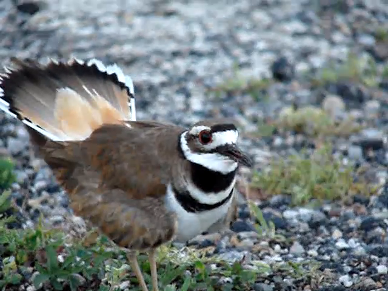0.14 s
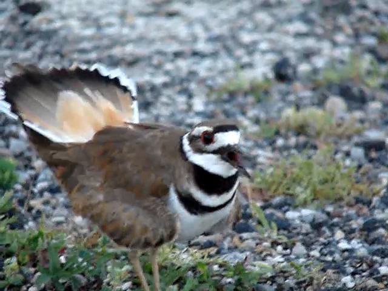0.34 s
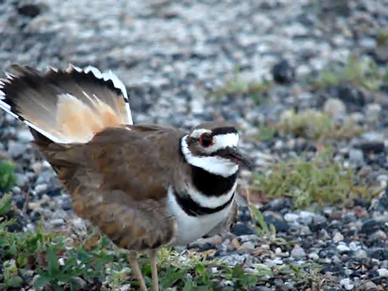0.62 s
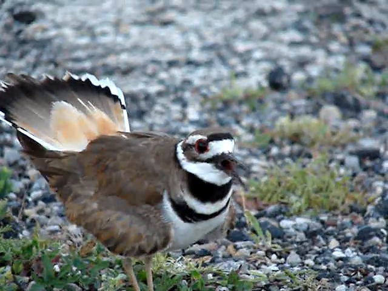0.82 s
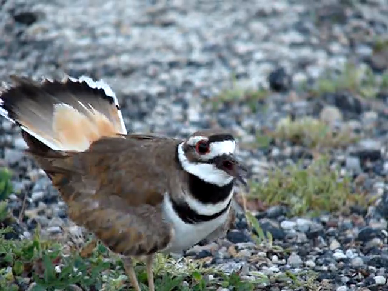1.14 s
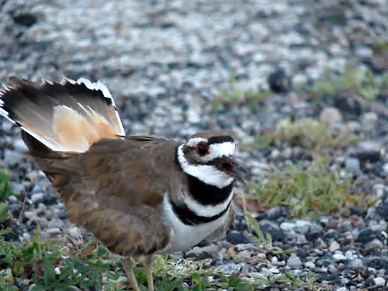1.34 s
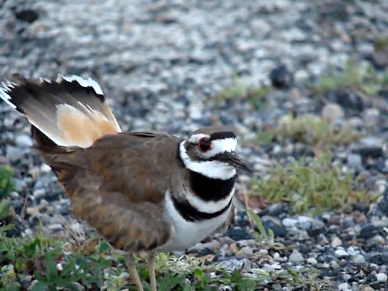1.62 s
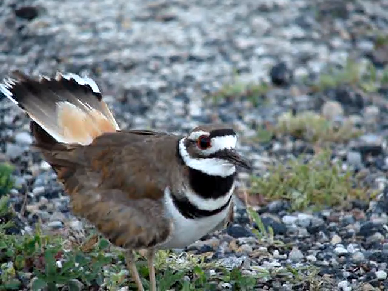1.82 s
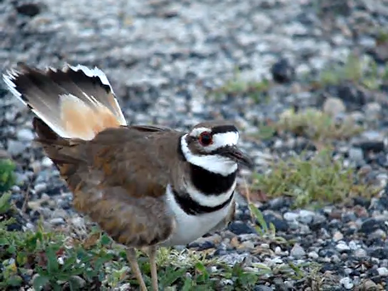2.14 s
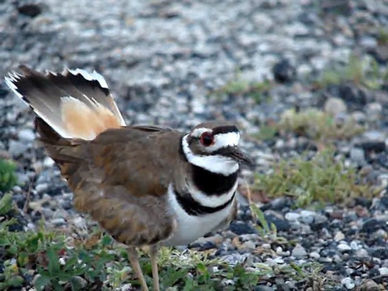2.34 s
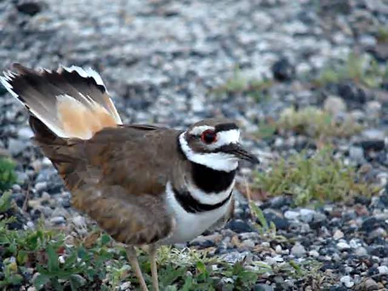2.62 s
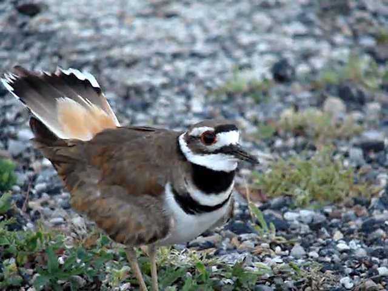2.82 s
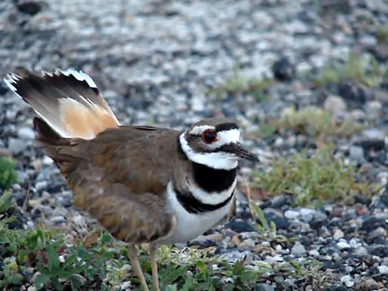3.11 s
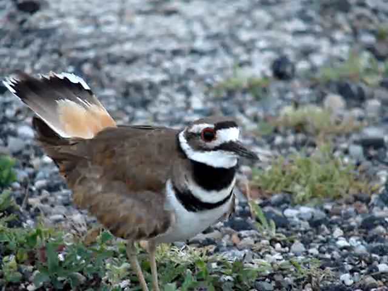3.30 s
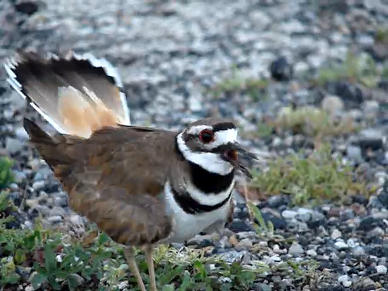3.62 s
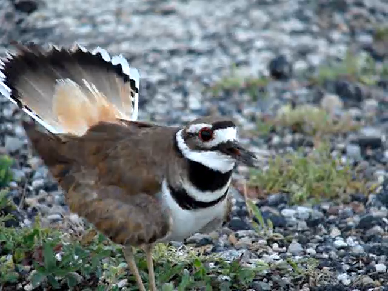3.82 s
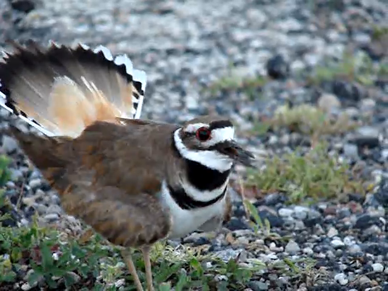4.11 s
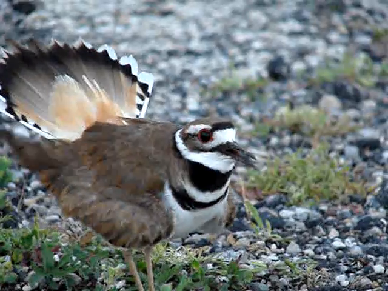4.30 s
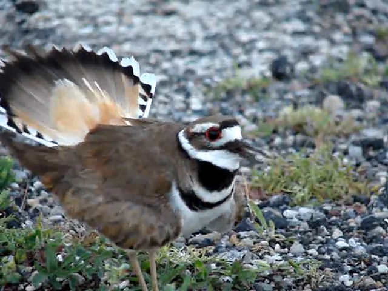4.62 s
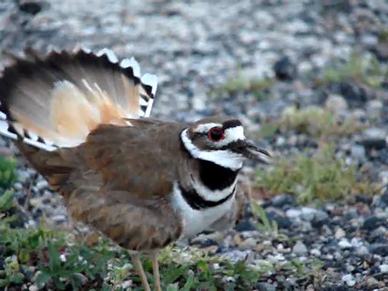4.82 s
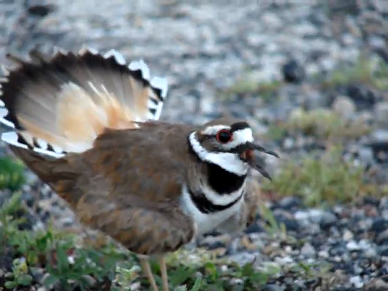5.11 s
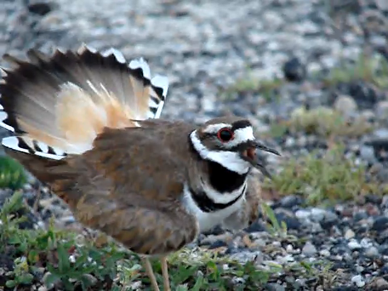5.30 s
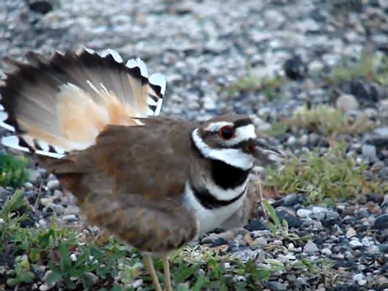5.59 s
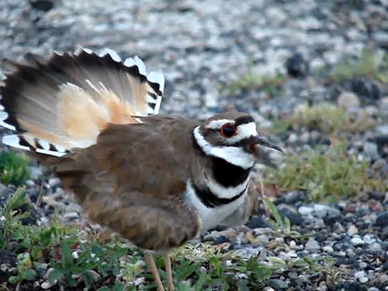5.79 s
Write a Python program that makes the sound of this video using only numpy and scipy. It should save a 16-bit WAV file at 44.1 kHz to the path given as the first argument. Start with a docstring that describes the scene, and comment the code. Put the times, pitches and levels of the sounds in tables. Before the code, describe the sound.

A killdeer calls very near the microphone outdoors. Short, shrill, arched peeps repeat about seven times a second, grow fainter and break into a soft rising whistle and a few scattered notes. After a second of near quiet with tiny far chirps and a dry tick, one longer cry starts a faster, higher, raspier run lasting to the end. Faint air and distant traffic lie beneath.

```python
"""A shorebird on open gravel gives strings of short shrill notes close by, with a few soft whistles.
Notes are near-sine partials on one gliding phase, mostly arched in pitch and shaken by complex noise.
In many, strong-weak cycles add lines between the overtones. Delayed copies and a noise tail give echoes.
Sliding sines make far chirps, resonant bursts ticks, wavering sines hums, shaped noise rumble and air.
The recorder's gain drops on loud notes and rises in the pauses."""
import sys
import numpy as np
from scipy import signal
from scipy.fft import rfft, irfft
from scipy.io import wavfile
from scipy.ndimage import uniform_filter1d

SR = 44100
rng = np.random.default_rng(int(sys.argv[2]) if len(sys.argv) > 2 else 0)


def pcm_store(signal):
    """Save signal as 16-bit PCM."""
    levels = np.round(np.clip(np.atleast_2d(signal), -1, 1) * 32767)
    wavfile.write(sys.argv[1], SR, levels.astype(np.int16).T)


N = 262386

# Loud notes, pitch of the loudest partial before sag and push: (start [s], length [s], base level [dB],
# first pitch [Hz], top pitch [Hz], onset of strong-weak cycles [share of length], their strength [dB])
NOTES = [(-.0261, 0.067, -11.5, 3800, 4413, 0.2, -21), (0.1178, 0.064, -12, 3940, 4365, 0.43, -22.5),
         (0.2683, 0.069, -12.5, 3896, 4378, 0.57, -24), (0.4152, .077, -12, 3950, 4507, .46, -22),
         (0.571, .067, -13.5, 3910, 4402, 0.49, -24), (0.734, .064, -15, 3830, 4277, 0.82, -17.5),
         (0.8844, 0.085, -13.5, 4100, 4526, 0.17, -24), (1.058, 0.053, -19.5, 3730, 4012, 0.35, -46.5),
         (1.21, 0.072, -15, 3870, 4406, 0.7, -27.5), (1.3657, 0.067, -15.5, 3740, 4375, 0.6, -25),
         (1.5348, 0.056, -22.5, 3680, 3952, 0.06, -44.5), (2.0595, .14, -15, 4176, 4460, 0.4, -37.5),
         (2.368, .043, -27.5, 3770, 3748, 0.46, -40.5), (2.5593, 0.072, -17, 3770, 4278, 0.23, -56),
         (3.612, .17, -12.5, 4220, 4534, .86, -22), (3.85, 0.076, -14, 4674, 4612, .23, -21.5),
         (3.9781, .06, -12, 4515, 4610, 0.54, -20), (4.0922, 0.066, -11.5, 4650, 4614, .54, -17),
         (4.2129, 0.054, -12.5, 4637, 4550, 0, -22), (4.3223, 0.071, -10.5, 4610, 4587, 0.38, -20.5),
         (4.4514, 0.062, -11.5, 4390, 4475, 0.2, -21), (4.5712, .061, -11.5, 4320, 4500, 0.17, -19.5),
         (4.6909, 0.063, -12, 4410, 4445, 0, -20), (4.8134, 0.068, -11, 4340, 4523, 0.05, -19.5),
         (4.9404, .069, -11, 4502, 4565, .09, -19.5), (5.0673, 0.063, -12, 4470, 4565, 0.11, -19),
         (5.1893, 0.077, -13.5, 4703, 4585, 0, -20), (5.3245, .087, -11.5, 4580, 4642, 0.37, -24),
         (5.4685, 0.06, -13, 4470, 4593, 0.15, -19), (5.591, 0.063, -13, 4460, 4525, 0.13, -21),
         (5.716, 0.056, -13.5, 4220, 4470, 0.26, -19), (5.842, 0.069, -13, 4440, 4537, 0, -19)]
# Gain at the start of every note, squeak, catch, full voice: (time before stretching [s], gain [dB])
ONSET = [(-.004, -110), (0, -30), (.002, -13), (.003, -19), (.0045, -3), (.007, 0)]
# Soft whistle: (time [s], loudest partial [Hz], base level [dB])
WHISTLE = [(1.6, 4450, -81.5), (1.606, 4530, -36.5), (1.62, 4490, -37.5), (1.634, 3780, -47),
           (1.67, 3880, -43), (1.81, 4130, -49), (1.84, 4196, -40), (1.865, 4353, -36), (1.914, 4410, -35),
           (1.926, 4315, -59.5)]
# Short whistle after a late note: (time [s], loudest partial [Hz], base level [dB])
SHORT_WHISTLE = [(5.53, 4250, -60), (5.537, 4180, -35.5), (5.567, 4230, -40.5), (5.575, 4096, -69)]
# Partials: (multiple of the loudest [ratio], gain [dB], gain per 100 Hz below 4500 Hz [dB])
OVERTONES = [(0.5, -22.5, 1.0), (1.0, 1, 0.0), (1.5, -24.5, 0.0), (2.0, -31, 0.5)]
# Lines of the strong-weak cycles: (multiple of the loudest partial [ratio], gain [dB])
HALF_LINES = [(0.25, -24.5), (0.75, -6), (1.25, 2), (2.25, -9)]
# Far chirps: (start [s], length [s], gain [dB])
CHIRPS = [(0.2, 0.018, -66), (2.677, 0.016, -64), (2.947, 0.021, -62.5), (2.993, 0.025, -62.5),
          (3.032, 0.031, -62), (3.37, 0.019, -62.5), (3.414, 0.014, -60.5), (3.454, 0.027, -62.5)]
# Dry ticks: (start [s], gain before resonance [dB], centre [Hz])
TICKS = [(3.185, -34.5, 4720), (5.792, -30, 3400)]
# Hums before wavering: (time [s], pitch [Hz], level of the fundamental [dB])
HIGH_HUM = [(0, 148.8, -61.5), (.77, 153.4, -67.5), (.89, 151.4, -61.5), (.93, 143.8, -67.5),
            (1.05, 152.8, -91.5), (1.16, 151, -57.5), (1.27, 143.7, -85.5)]
LOW_HUM = [(1.22, 101.4, -79), (1.33, 100.8, -70.5), (2.1, 101.6, -76), (2.38, 101, -70.5),
           (3.5, 104.2, -69.5), (5.95, 107.6, -67.5)]
# Distant traffic rumble, swelling and passing, before throbbing: (time [s], level [dB])
RUMBLE = [(0, -80), (.7, -71), (2.3, -81), (3.0, -72), (3.7, -69.5), (4.3, -84), (5.95, -85.5)]
# Relative spectrum of the steady noise: (frequency [Hz], density [dB])
AIR_SPECTRUM = [(30, -12), (300, -13.5), (800, -14.5), (1820, -14), (2200, -17.5), (4600, -23),
                (10300, -25.5)]
# Broad drones: (centre [Hz], width of each resonance [Hz], level [dB])
DRONES = [(660, 170, -71.5), (866.5, 55, -73), (1725, 47, -85)]

# Pitch of a note
CLIMB_POWER, SAG_POWER = 1.9, 2  # curvature before and after the top
LONG_CRY_S, CRY_CLIMB_S = .1, .037  # longer cries climb quickly, then hold
FALL_S, SLACK_HZ, SAG_SHARE = .027, 3400, .56  # final sag part of the way to the slack pitch
FULL_SAG_DB, SAG_RANGE_DB = -22.25, 6.5  # fainter notes sag less
PUSH_FROM_S, PUSH_S, PUSH_HZ = .08, .03, 83.33  # held notes are pushed higher
SETTLE_HZ, SETTLE_S = 159, .0015
SQUEAK_STRETCH, STRETCH_PER_100_HZ = .6, .09  # the squeak lasts longer before a bigger climb
# Loudness of a note
FIRST_DB, SWELL_DB_PER_100_HZ = 1, .77  # starts softer the more it has to climb
FADE_S, FADE_DB, FADE_SHARE = .019, 22.5, .3  # FADE_SHARE: longest fade as a share of the length
# Roughness
EVEN_AGAIN_S = .009  # strong-weak cycles stop this long before the end
RASP_LOSS_DB_PER_100_HZ = 1.13  # lower, slacker notes are purer
HALF_LINE_RASP = 1.8  # half lines are shaken harder
# Echoes and air
SLAP_DB, SLAP_S = -56.5, .086  # one clear echo
ECHO_DB, ECHO_T60_S, ECHO_START_S = -49.5, 1, .05
AIR_DB = -61
# Recorder
HOLD_DB, RELEASE_DB_PER_S, MOST_GAIN_DB, ATTACK_S = -10.8, 5.5, 8, .001
HELD_AT_START_DB = -9
OFFSET, BLOCK_HZ = -.025, 4.5
TOP, HISS_DB, CUTOFF_HZ = 1, -69.5, 10450


def amp(db):
    """dB to gain."""
    return 10 ** (np.asarray(db) / 20)


def rms_one(x):
    """Scale to rms 1."""
    return x / np.sqrt(np.mean(x ** 2) + 1e-20)


def drift(rate_hz):
    """Random drift: steeply low-passed noise of rms 1."""
    sos = signal.butter(6, rate_hz, fs=SR, output="sos")
    return rms_one(signal.sosfilt(sos, rng.standard_normal(N + SR))[SR:])


def in_time(rows):
    """Pitch and gain of a (time, pitch, level) curve; silent outside its span."""
    s, hz, db = np.transpose(rows)
    t = np.arange(N) / SR
    return np.interp(t, s, hz), amp(np.interp(t, s, db, left=-150, right=-150))


def resonate(x, hz, width_hz):
    """Two-pole resonance, gain about 1 on top."""
    r = np.exp(-np.pi * width_hz / SR)
    poles = [1, -2 * r * np.cos(2 * np.pi * hz / SR), r * r]
    return signal.lfilter([(1 - r * r) / 2, 0, (r * r - 1) / 2], poles, x)


def bird():
    """Loud notes and soft whistles from one kind of voice."""
    notes = voice(*note_controls(), rasp=.065)
    whistles = sum(voice(*in_time(rows), 1, 0, rasp=.07) for rows in (WHISTLE, SHORT_WHISTLE))
    return notes + whistles


def note_pitch(t, lead, length, db, first_hz, top_hz, squeak_hz):
    """Tense membranes squeak faintly, jump onto the note, move to its top pitch and sag."""
    climb_s = CRY_CLIMB_S if length > LONG_CRY_S else length - FALL_S
    climb = np.clip(1 - t / climb_s, 0, 1) ** CLIMB_POWER
    sag_depth = np.clip(1 + (db - FULL_SAG_DB) / SAG_RANGE_DB, .1, 1)
    sag = sag_depth * np.clip(1 - (length - t) / FALL_S, 0, 1) ** SAG_POWER
    hz = top_hz - (top_hz - first_hz) * climb - SAG_SHARE * (top_hz - SLACK_HZ) * sag
    hz += PUSH_HZ * np.clip((t - PUSH_FROM_S) / PUSH_S, 0, 1)
    hz += (squeak_hz - first_hz) * np.interp(lead, [.0027, .0037], [1, 0])
    return hz - SETTLE_HZ * np.exp(-np.maximum(t, 0) / SETTLE_S)  # settles from below


def note_level_db(t, lead, length, db, first_hz, top_hz):
    """Onset, swell, fade and final cut of one note."""
    left = length - t
    swell_db = FIRST_DB - SWELL_DB_PER_100_HZ * (top_hz - first_hz) / 100
    swell = np.clip(1 - t / (length - FADE_S), 0, 1)
    fade = np.clip(1 - left / min(FADE_S, FADE_SHARE * length), 0, 1) ** 1.93
    onset_db = np.interp(lead, *np.transpose(ONSET))
    cut_db = np.interp(-left, [0, .005], [0, -70])
    return db + swell_db * swell - FADE_DB * fade + onset_db + cut_db


def note_controls():
    """Pitch, gain, overtone opening and strong-weak share over all notes."""
    hz, gain, opening, uneven = np.full(N, 4400.), np.zeros(N), np.zeros(N), np.zeros(N)
    flicker = np.clip(.29 + drift(45), .1, 1.5)
    squeaks_hz = rng.uniform(4850, 5300, len(NOTES))
    for (start, length, db, first_hz, top_hz, on, uneven_db), squeak_hz in zip(NOTES, squeaks_hz):
        first = max(round((start - .004) * SR), 0)
        at = np.arange(first, min(round((start + length + .005) * SR), N))
        t = at / SR - start
        left = length - t
        # onset clock: time before 4.5 ms is stretched
        stretch = np.clip(SQUEAK_STRETCH + STRETCH_PER_100_HZ * (top_hz - first_hz) / 100, .4, 1.4)
        lead = t + np.minimum(t - .0045, 0) * (1 / stretch - 1)
        hz[at] = note_pitch(t, lead, length, db, first_hz, top_hz, squeak_hz)
        gain[at] = amp(note_level_db(t, lead, length, db, first_hz, top_hz))
        opening[at] = np.clip((t - .003) / .0039, 0, 1) * np.clip((left - .004) / .0024, 0, 1)
        ramp = np.clip(np.minimum(t - on * length, left - EVEN_AGAIN_S) / .0019 + .5, 0, 1)
        # flickering trace of the cycles throughout, stronger in long cries
        uneven[at] = amp(uneven_db) * ramp + amp(-67 + 203 * length) * flicker[at]
    return [uniform_filter1d(c, size=40) for c in (hz, gain, opening, uneven)]


def turbulence(lower, opening, rasp):
    """Air turbulence: complex noise about 1 that shakes strength and timing alike."""
    fast, slow = (drift(rate) + 1j * drift(rate) for rate in (500, 90))
    # rasp favours a few hundred beats a second: bands on both sides of each partial
    fast = .6 * fast + 2 * resonate(fast, 370, 170)
    # upper bands stronger, in gusts
    fast = (fast + .4 * signal.hilbert(fast.real)) * amp(2.5 * drift(40))
    depth = rasp * amp(3.3 * drift(8) - RASP_LOSS_DB_PER_100_HZ * lower)
    # rougher at both ends of a note, where the membranes barely vibrate
    return 1 + depth * (2.2 - 1.63 * opening) * fast + .092 * slow


def voice(hz, gain, opening, uneven, rasp):
    """Near-sine partials on one phase, with half lines from strong-weak cycles."""
    phase = 2 * np.pi * np.cumsum(hz) / SR
    lower = (4500 - hz) / 100
    shake = turbulence(lower, opening, rasp)
    out = np.zeros(N)
    for multiple, db, slope_db in OVERTONES:
        if multiple == 1.5:  # needs effort: fades in soft passages
            db = db + np.minimum(0, .45 * (20 * np.log10(gain + 1e-9) + 30))
        if multiple == 2:  # weaker in loud low notes
            db = db - np.maximum(0, 4150 - hz) * gain * .71
        partial = (1 + multiple * (shake - 1)) * np.exp(1j * multiple * phase)
        out += amp(db + slope_db * lower) * (1 if multiple == 1 else opening) * partial.imag
    waver = uneven * opening * amp(2.5 * drift(60))
    half_shake = 1 + HALF_LINE_RASP * (shake - 1)
    for multiple, db in HALF_LINES:
        line = half_shake * np.exp(1j * multiple * (phase + 1))
        out += amp(db) * waver * line.imag
    return np.sqrt(2) * gain * out


def surroundings(x):
    """One clear echo and a scattered tail from far ground and bushes."""
    t = np.arange(SR) / SR
    tail = rng.standard_normal(SR) * amp(-60 * t / ECHO_T60_S) * np.clip(t / ECHO_START_S, 0, 1)
    tail /= np.sqrt(np.sum(tail ** 2))
    # moving air and leaves break the echoes up and blur their pitch
    flutter = amp(4 * drift(15)) * drift(200)
    slap = amp(SLAP_DB + 2.7 * drift(44)) * np.pad(x, (round(SLAP_S * SR), 0))[:N]
    return slap + amp(ECHO_DB) * flutter * signal.fftconvolve(x, tail)[:N]


def far_chirps():
    """Short sines sliding down from 4800 Hz at 20 kHz per second."""
    out = np.zeros(N)
    for start, length, db in CHIRPS:
        t = np.arange(round(length * SR)) / SR
        phase = 2 * np.pi * np.cumsum(4800 - 20000 * t) / SR
        envelope = np.sqrt(2 * np.sin(np.pi * t / length))
        out[round(start * SR):][:len(t)] += amp(db) * envelope * np.sin(phase)
    return out


def ticks():
    """Noise bursts dying 60 dB in 15 ms through two wide resonances."""
    out, t = np.zeros(N), np.arange(1500) / SR
    for start, db, hz in TICKS:
        burst = rng.standard_normal(1500) * amp(-60 * t / .015)
        burst = resonate(resonate(burst, hz, hz * .7), hz, hz * .7)
        out[round(start * SR):][:1500] += amp(db) * burst
    return out


def hum(rows, overtones):
    """Low harmonic tone wavering in pitch and level; overtone gains from the second harmonic up."""
    hz, gain = in_time(rows)
    phase = 2 * np.pi * np.cumsum(hz + 1.5 * drift(8)) / SR
    tone = np.sin(phase)
    for harmonic, share in enumerate(overtones, start=2):
        tone += share * np.sin(harmonic * phase)
    return np.sqrt(2) * gain * amp(1.5 * drift(6.6)) * tone


def rumble():
    """Distant traffic: a throbbing low noise band."""
    s, db = np.transpose(RUMBLE)
    sos = signal.butter(2, [70, 450], "band", fs=SR, output="sos")
    band = rms_one(signal.sosfilt(sos, rng.standard_normal(N)))
    return amp(np.interp(np.arange(N) / SR, s, db) + 2.5 * drift(6)) * band


def distance():
    """Steady noise with a shaped spectrum and a few broad resonant drones."""
    hz = np.maximum(np.fft.rfftfreq(N, 1 / SR), 1)
    spectrum_hz, spectrum_db = np.transpose(AIR_SPECTRUM)
    colour = amp(np.interp(np.log(hz), np.log(spectrum_hz), spectrum_db))
    out = amp(AIR_DB) * rms_one(irfft(rfft(rng.standard_normal(N)) * colour, N))
    for centre_hz, width_hz, db in DRONES:
        drone = resonate(rng.standard_normal(N), centre_hz, width_hz)
        out += amp(db) * rms_one(resonate(drone, centre_hz, width_hz))
    return out


def scene():
    """Everything at the microphone, one channel."""
    call = bird()
    hums = hum(HIGH_HUM, [.34]) + hum(LOW_HUM, [.38, .2, .35])
    return (call + surroundings(call) + far_chirps() + ticks() + hums + rumble() + distance())[None]


def record(dry):
    """Gain control with fast drop and slow rise; then rounded peaks, hiss, DC block and top cut."""
    power = uniform_filter1d(dry[0] ** 2, size=600)
    level_db = 10 * np.log10(np.maximum(power, 1e-12))
    level_db[0] = HELD_AT_START_DB  # gain starts pulled down, as after earlier calls
    # peak hold falling at the release rate
    ramp = RELEASE_DB_PER_S * np.arange(N) / SR
    held_db = np.maximum.accumulate(np.maximum(level_db, HOLD_DB - MOST_GAIN_DB) + ramp) - ramp
    gain_db = HOLD_DB - held_db
    r = np.exp(-1 / (ATTACK_S * SR))
    gain_db = signal.lfilter([1 - r], [1, -r], gain_db - gain_db[0]) + gain_db[0]
    # an offset ahead of the gain stage thumps when the gain drops
    gained = (dry + OFFSET) * amp(gain_db) - OFFSET * amp(gain_db[0])
    rounded = TOP * np.tanh(gained / TOP)
    hissing = rounded + amp(HISS_DB) * rng.standard_normal(N)
    blocked = signal.sosfilt(signal.butter(1, BLOCK_HZ, "high", fs=SR, output="sos"), hissing)
    return signal.sosfilt(signal.cheby2(12, 50, CUTOFF_HZ, fs=SR, output="sos"), blocked)


dry = scene()
out = record(dry)
pcm_store(out)
```